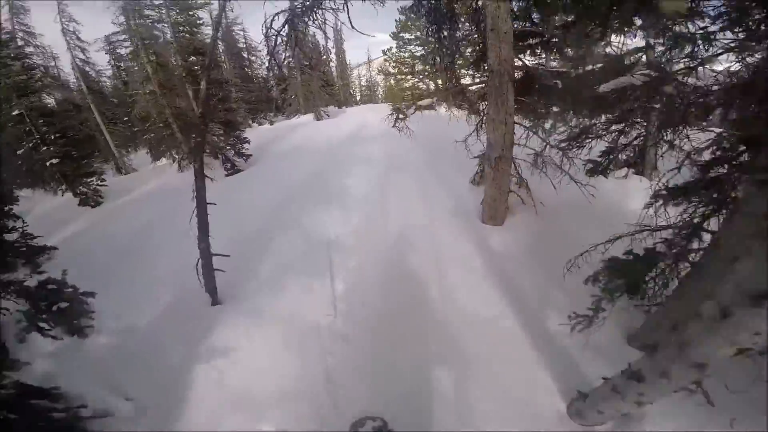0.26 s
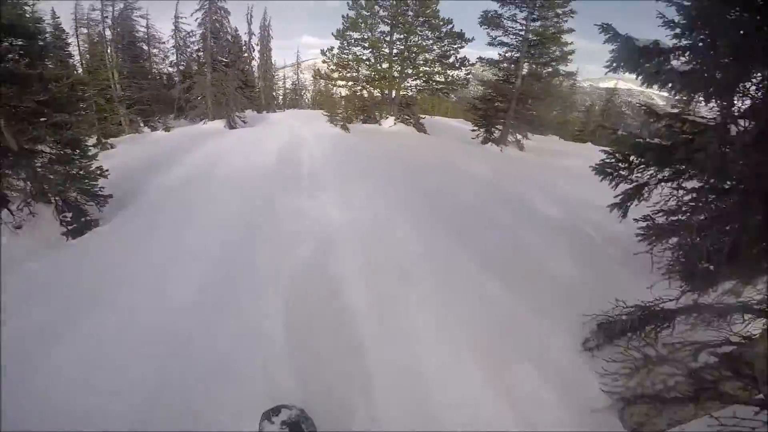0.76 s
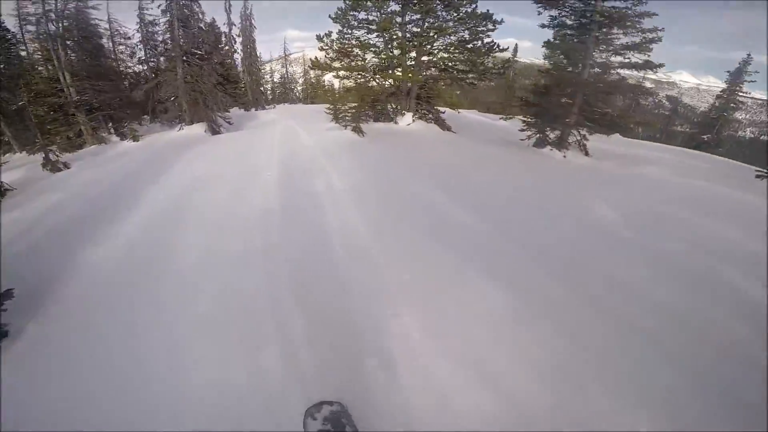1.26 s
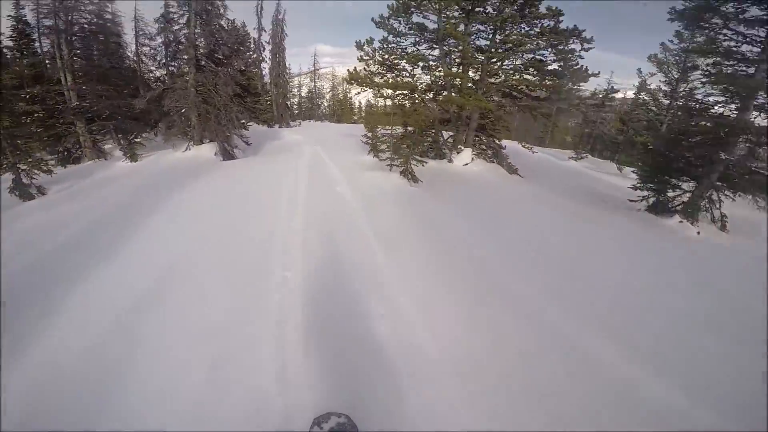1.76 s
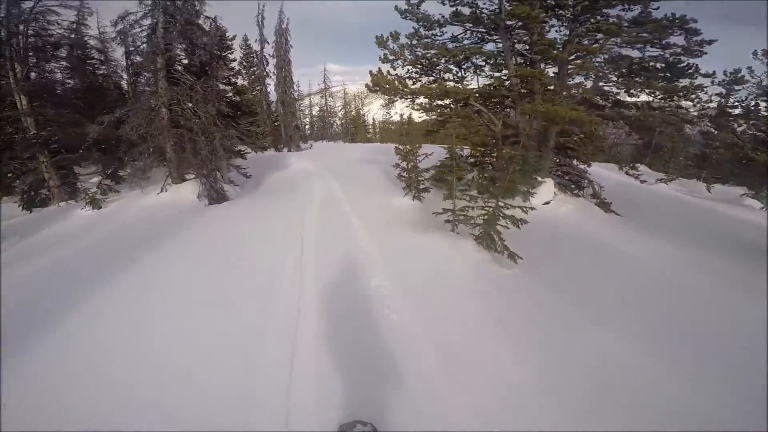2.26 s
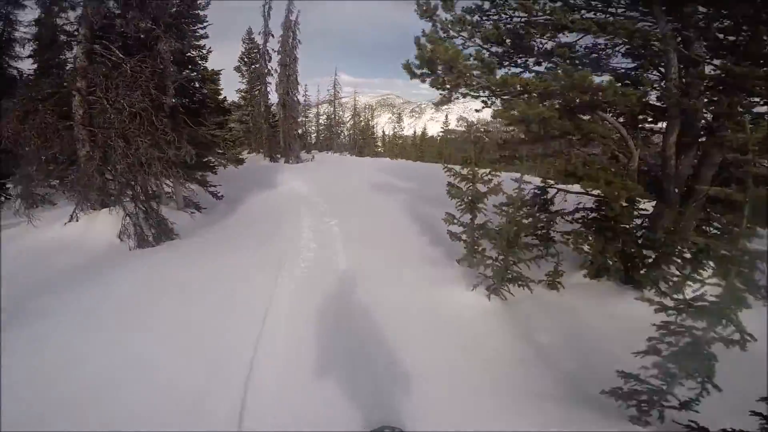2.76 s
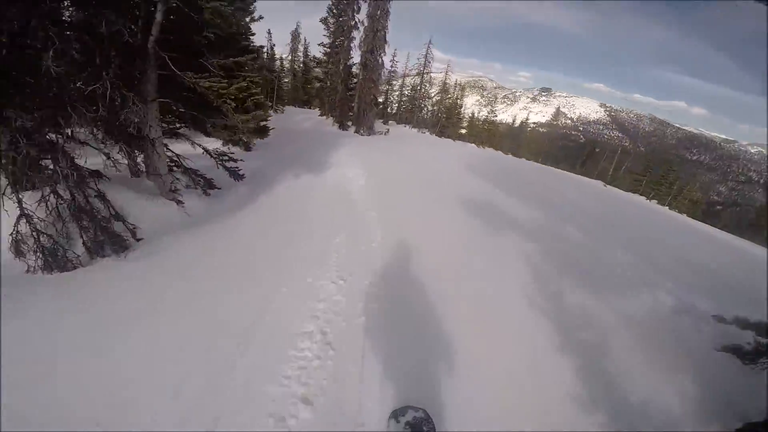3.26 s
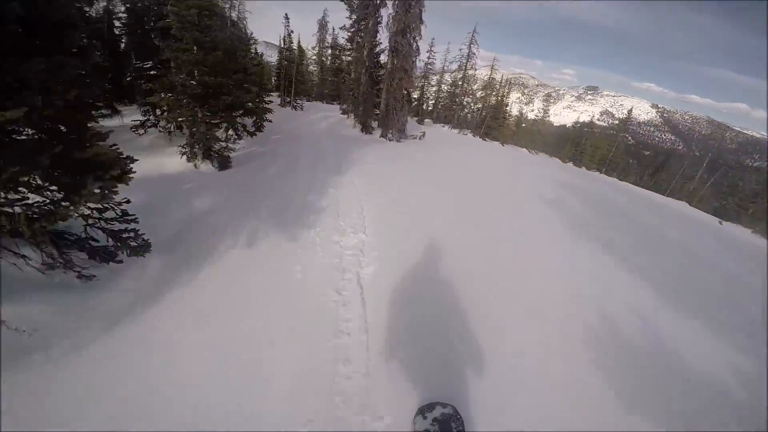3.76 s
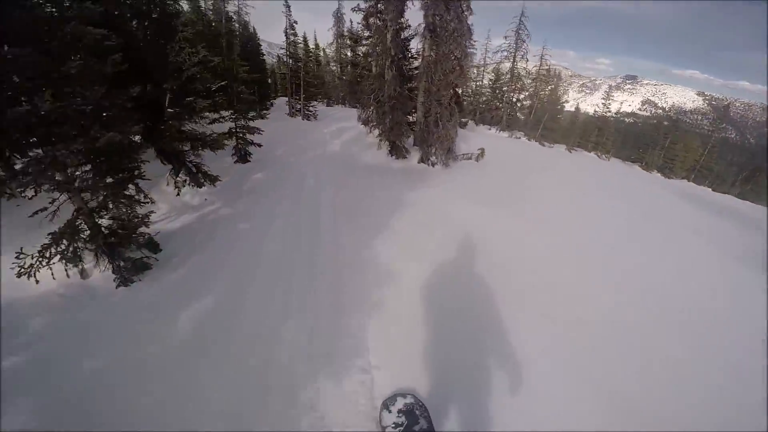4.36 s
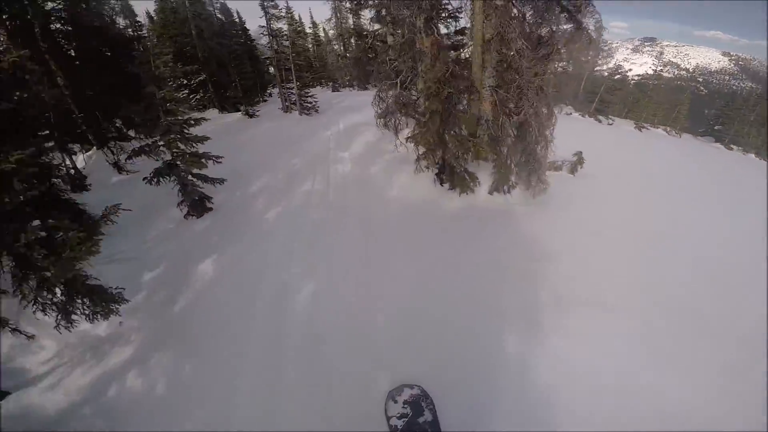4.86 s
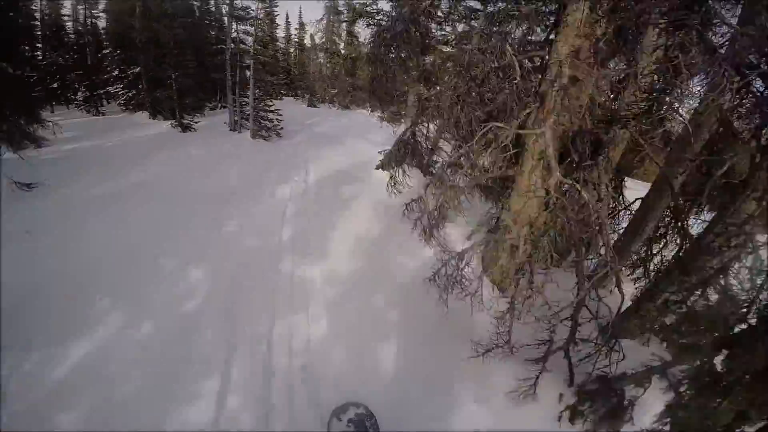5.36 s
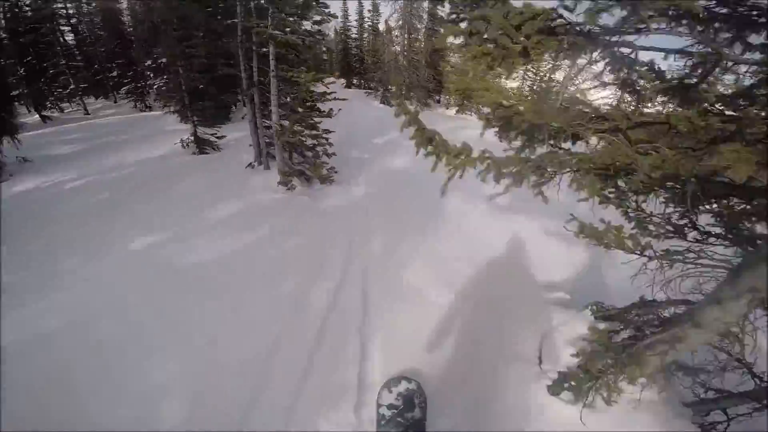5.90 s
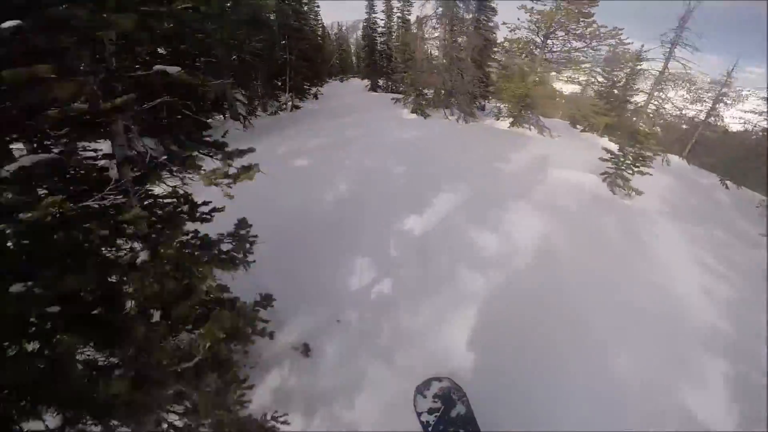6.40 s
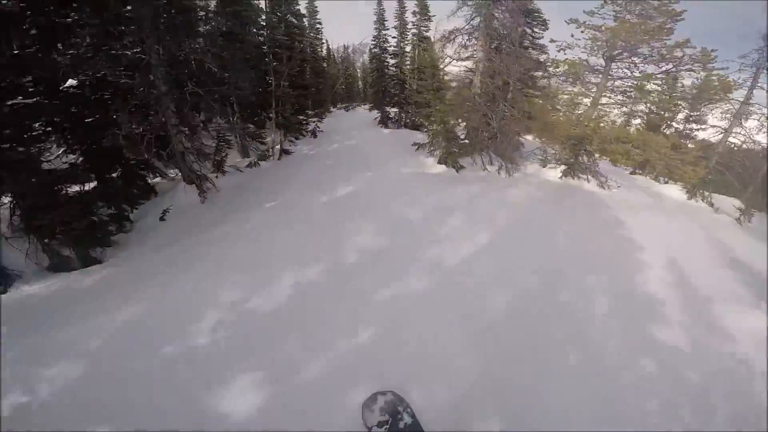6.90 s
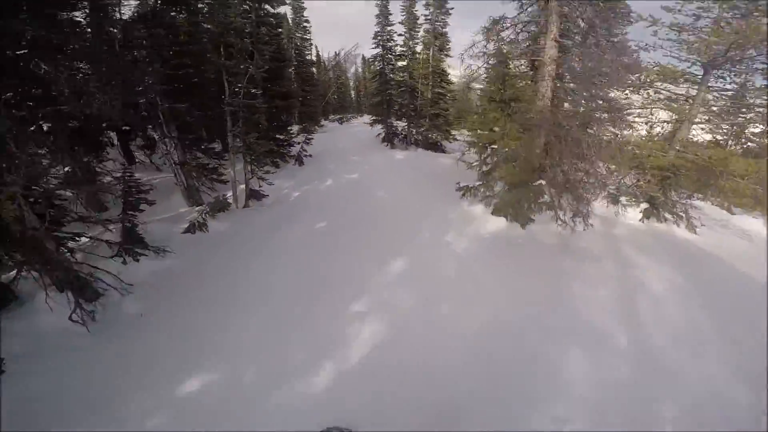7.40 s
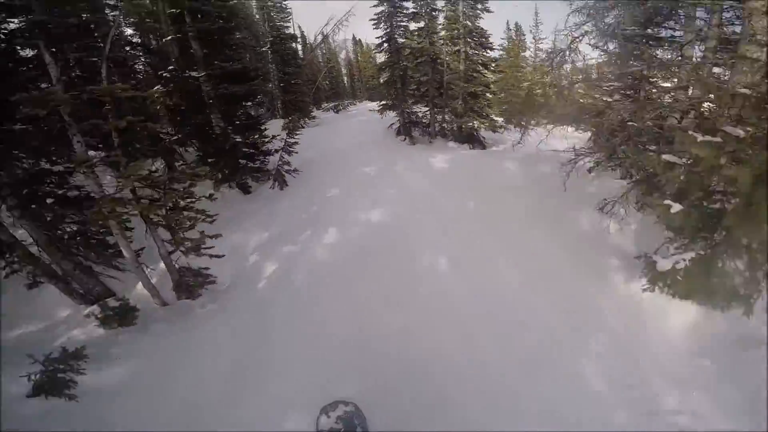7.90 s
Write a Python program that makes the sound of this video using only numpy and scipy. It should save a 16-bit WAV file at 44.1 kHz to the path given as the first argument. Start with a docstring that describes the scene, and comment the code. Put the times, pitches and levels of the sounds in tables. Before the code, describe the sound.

A snowboard hisses through powder, quiet at first and then thickening, under low rumbling wind, with one loud branch slap near the end.

```python
"""A snowboard runs through powder: shearing crystals are random clicks filtered into hiss, spray and dust.
All is heard from a camera in a housing on the rider's helmet; turns and clumps of snow raise the hiss.
Wind is filtered noise that rumbles, shakes the mount, blows through the housing's gaps and whistles once.
The mount clacks over a few bumps and a fir branch slaps the camera once: short contacts ring the housing's
modes, and the mount swings as decaying sines. Crumbs of snow tick as short bursts of band-passed noise."""
import sys
import numpy as np
from scipy import signal
from scipy.fft import rfft, irfft
from scipy.io import wavfile
from scipy.ndimage import uniform_filter1d, minimum_filter1d

SR = 44100
rng = np.random.default_rng(int(sys.argv[2]) if len(sys.argv) > 2 else 0)


def store_wav(level_fs):
    """Save 16-bit WAV to argv[1]."""
    pcm = np.round(np.clip(np.atleast_2d(level_fs), -1, 1) * 32767)
    wavfile.write(sys.argv[1], SR, pcm.T.astype(np.int16))


N = 359104
TIME = np.arange(N) / SR   # s

# Wind pressure of the airspeed. Each row: time in seconds, level relative to cruising in dB.
AIRSPEED = [(0.0, -9), (1.1, -9), (2.0, -12.5), (2.85, -10.5), (3.55, -1.5), (4.1, -2), (6.0, 1.5),
            (6.6, -0.5), (7.1, 1), (8.14, 2.5)]


def from_db(db):
    """Amplitude ratio: 20 dB is a factor of ten."""
    return 10 ** (np.asarray(db) / 20)


def rms_one(x):
    """Power normalisation: scale to unit rms."""
    return x / np.sqrt(np.mean(x ** 2) + 1e-20)


def in_time(rows):
    """Linear interpolation: each level column of a curve at every sample."""
    seconds, *columns = np.transpose(rows)
    return [np.interp(TIME, seconds, column) for column in columns]


def held(start, end, attack_s, release_s):
    """Trapezoidal envelope: rise to 1 by start, hold until end, fall back to 0."""
    rise = 1 + (TIME - start) / attack_s
    fall = 1 - (TIME - end) / release_s
    return np.clip(np.minimum(rise, fall), 0, 1)


def swell(s, half_length):
    """Gaussian envelope: a smooth bump of height 1 around time s."""
    return np.exp(-np.minimum(((TIME - s) / half_length) ** 2, 50))


def coloured(x, spectrum):
    """Linear filtering by Fourier transform: weight x by a spectrum, then scale to rms 1."""
    hz, db = np.transpose(spectrum)
    bins = np.arange(N // 2 + 1) * SR / N + 1e-3
    octaves_beyond = np.abs(np.log2(bins / np.clip(bins, hz[0], hz[-1])))
    # outside the table the level falls by 20 dB per octave
    gain_db = np.interp(np.log(bins), np.log(hz), db) - 20 * octaves_beyond
    return rms_one(irfft(rfft(x) * from_db(gain_db), N))


def drift(rate_hz):
    """Low-passed noise: two equal poles at rate_hz give a smooth random wandering of spread 1."""
    step = 40   # samples between the points of the slow noise
    r = np.exp(-2 * np.pi * rate_hz * step / SR)
    points = rng.standard_normal(N // step + 2002)
    slow = signal.lfilter([1], [1, -2 * r, r * r], points)[2000:]   # without the filter's start
    return np.interp(np.arange(N) / step, np.arange(len(slow)), rms_one(slow))


def steadied(x, window_s):
    """Envelope division: local rms evens out the slow swells of a noise and keeps its quick lumps."""
    power = uniform_filter1d(x ** 2, max(int(window_s * SR), 2))
    return rms_one(x / np.sqrt(np.abs(power) + 1e-9))


def grains(per_s, spread_db):
    """Shot noise: independent random clicks of uneven size."""
    size_db = spread_db * np.minimum(rng.exponential(1, N), 5)
    sizes = from_db(size_db) * rng.standard_normal(N)
    return sizes * (rng.random(N) < per_s / SR)


def resonance(x, hz, width_hz):
    """Damped resonator: a two-pole band-pass with gain 1 on top."""
    r = np.exp(-np.pi * width_hz / SR)
    numerator = np.array([1, 0, -1]) * (1 - r * r) / 2
    return signal.lfilter(numerator, [1, -2 * r * np.cos(2 * np.pi * hz / SR), r * r], x)


def ring(clicks, hz, t60):
    """Impulse response of a damped mode: a unit click starts a decaying sine of height 1."""
    r = np.exp(-np.log(1000) / (t60 * SR))
    w = 2 * np.pi * hz / SR
    return signal.lfilter([0, np.sin(w)], [1, -2 * r * np.cos(w), r * r], clicks + 1e-18)


def add(out, s, sound):
    """Superposition: mix a short sound in at time s."""
    at = int(s * SR)
    out[at:at + len(sound)] += sound[:N - at]


def snow(lumps_db=0.87, patter_db=0.4, unevenness_db=1.35):
    """Granular friction: crystals shear under the base as hiss and fly off the edge as spray and dust."""
    # Rubbing of the board between turns. Each row: time in seconds, gliding hiss in dB.
    board = [(0.0, -71.5), (0.3, -58), (0.6, -58.5), (0.8, -67), (1.4, -68), (1.7, -84), (1.95, -65.5),
             (2.6, -65.5), (3.32, -60.5), (3.42, -53), (3.88, -54.5), (4.05, -49.5), (4.5, -49),
             (5.85, -49.5), (6.42, -46.5), (6.72, -54), (7.05, -45.5), (7.75, -48), (8.14, -44)]
    # The edge digs in and throws snow. Each row: start and end in seconds, rise of hiss and of spray in dB.
    turns = [(0.0, 0, 13, -5), (2.914, 2.955, 3.5, 8), (3.558, 3.582, 6, 2.5), (4.93, 5.696, 1, 7),
             (5.257, 5.423, 3, 3.5), (5.61, 5.68, 4.5, 4), (7.187, 7.55, 5, 5.5), (7.476, 7.537, 3, 4.5),
             (8.041, 8.038, 7, 10)]
    # The board breaks through a firmer clump. Each row: start in seconds, rise in dB, decay in seconds.
    clumps = [(2.303, 9, 0.023), (2.975, 6, 0.017), (3.229, 13.5, 0.028), (3.522, 4, 0.01),
              (3.968, 2, 0.011), (4.995, 1, .035), (5.125, 0, 0.0081), (6.14, 7.5, 0.012), (6.654, 8, .014),
              (7.947, 3, 0.0088)]
    # Fine powder blows over the housing. Each row: centre and half length in seconds, level in dB.
    clouds = [(1.5, 0.077, -67.5), (4.35, .4, -79), (5.42, .11, -65), (5.644, 0.098, -62.5),
              (6.36, 0.22, -70.5), (6.857, 0.15, -67)]
    # Spectra of the hiss and the spray. Each row: frequency in Hz, relative level in dB per Hz.
    glide_spectrum = [(300, -21.5), (620, -22.5), (950, -13), (1220, -4), (1340, -3.5), (1460, 2),
                      (1590, -4.5), (1740, -8.5), (2020, -8), (2300, -13.5), (3500, -21.5), (6000, -61),
                      (12000, -63)]
    spray_spectrum = [(1400, -41), (2000, -7.5), (2500, 2.5), (3100, 1.5), (3500, 5), (3900, 0.5),
                      (4250, 1), (4750, -5), (5200, -5.5), (5650, -10.5), (6100, -8.5), (7000, -16.5),
                      (9500, -37), (15000, -49)]

    glide_db, = in_time(board)
    speed_db, = in_time(AIRSPEED)
    # spray is -61 dB at a hiss of -50 dB and cruising speed; slopes in dB per dB
    spray_db = -61 + 0.85 * (glide_db + 50) + 0.55 * speed_db
    for start, end, hiss_rise_db, spray_rise_db in turns:
        edge = held(start, end, attack_s=0.098, release_s=0.11)
        glide_db = glide_db + hiss_rise_db * edge
        spray_db = spray_db + spray_rise_db * edge

    lumps = lumps_db * drift(21) + unevenness_db * drift(6.2)   # dB
    for s, rise_db, decay in clumps:
        add(lumps, s, rise_db * np.exp(-TIME[:SR // 5] / decay))

    glide_gain = from_db(glide_db + lumps + patter_db * drift(33))
    glide = coloured(grains(16000, spread_db=1.5), glide_spectrum) * glide_gain
    spray = coloured(grains(20000, spread_db=4.0), spray_spectrum) * from_db(spray_db + lumps)

    powder = from_db(spray_db - 24)   # a little of the spray always reaches the housing
    for s, half_length, db in clouds:
        powder = powder + from_db(db) * swell(s, half_length)
    dust = rms_one(resonance(grains(6000, spread_db=2.5), 5300, 4800)) * powder
    return glide + spray + dust


def wind(flicker_db=1.5, eddy_gust_share=0.059):
    """Turbulent pressure: big eddies press on the housing and shake the mount, small ones add a low rush."""
    # Gusts and lulls. Each row: centre and half length in seconds, change of buffeting and of shaking in dB.
    gusts = [(0.045, 0.21, -12, -4.5), (0.446, 0.046, 4, 4), (.68, 0.023, 15, 0), (0.943, .13, 4, 8.5),
             (1.888, .07, 8, 6), (2.423, 0.26, 5.5, 5), (3.38, 0.061, -5, 5), (3.525, 0.047, 6, -10),
             (3.803, 0.26, -6.5, 2.5), (4.926, 0.1, 12.5, 8), (5.5, 0.34, 7.5, 5), (6.19, 0.18, 6.5, 0.5),
             (6.795, 0.24, 5.5, 6.5), (7.164, .1, -7, 1), (7.955, 0.16, 9.5, 0), (8.14, 0.085, -14, 5)]
    # Spectra of the three wind noises. Each row: frequency in Hz, relative level in dB per Hz.
    buffet_spectrum = [(6, -20), (14, -2), (22, 1), (34, -5.5), (50, -21), (80, -34), (200, -59)]
    shake_spectrum = [(35, -22), (58, -3.5), (70, -6), (82, 0), (91, -8.5), (102, -15.5), (130, -32),
                      (220, -41)]
    eddy_spectrum = [(80, 6), (135, 4), (168, -1.5), (192, 4.5), (212, -4), (275, -3), (340, -9),
                     (480, -10.5), (650, -14), (1200, -14.5), (4000, -54)]

    speed_db, = in_time(AIRSPEED)
    push_db = sum(db * swell(s, half_length) for s, half_length, db, _ in gusts)
    rock_db = sum(db * swell(s, half_length) for s, half_length, _, db in gusts)
    # each level: dB at cruising speed, then dB per dB of wind pressure
    buffet_db = -37 + 0.22 * speed_db + push_db
    shake_db = -42 + 0.69 * speed_db + rock_db
    eddy_db = -51 + speed_db + eddy_gust_share * rock_db + flicker_db * drift(22)

    buffet = steadied(coloured(rng.standard_normal(N), buffet_spectrum), window_s=0.124)
    shake = steadied(coloured(rng.standard_normal(N), shake_spectrum), window_s=0.3)
    eddies = coloured(rng.standard_normal(N), eddy_spectrum)
    return buffet * from_db(buffet_db) + shake * from_db(shake_db) + eddies * from_db(eddy_db)


def draught(flutter_db=1.5):
    """Cavity resonance: fluttering air streams through the gaps and excites the housing's air cavities."""
    # Air through the gaps. Each row: time in seconds, hiss level in dB.
    stream = [(0, -75), (.95, -63.5), (1.2, -59.5), (1.55, -58.5), (1.66, -66), (1.85, -60.5),
              (2.45, -63.5), (3.3, -71), (4.2, -66), (8.14, -55.5)]
    # Air cavities of the housing. Each row: frequency and width in Hz, relative level in dB.
    cavities = [(459, 87, 3.5), (1410, 390, -8), (1930, 270, 2.5), (2700, 340, 1), (3520, 410, -2.5),
                (4290, 340, 2), (4960, 160, -2.5), (5270, 130, -1.5), (6190, 140, -5.5), (7300, 380, -13.5),
                (8550, 400, -12.5), (9700, 1250, -17)]

    air = rng.standard_normal(N) * from_db(flutter_db * drift(33))
    hiss = np.zeros(N)
    for k, (hz, width_hz, db) in enumerate(cavities):
        hiss += (-1) ** k * from_db(db) * resonance(air, hz, width_hz)   # neighbours in opposite phase
    level_db, = in_time(stream)
    return rms_one(hiss) * from_db(level_db)


def crumbs():
    """Band-limited burst: a crumb of snow ticks on the housing as a short, decaying fizz."""
    # Each row: start in seconds, level in dB, centre and width of the band in Hz, decay in seconds.
    crumb_list = [(0.67, -64, 10400, 7000, 0.014), (1.584, -59, 8000, 3500, .005),
                  (4.879, -59, 7200, 3000, .005), (5.432, -61, 12500, 5000, .016),
                  (5.834, -60, 10800, 5500, .016), (7.203, -57, 7600, 3000, .005),
                  (7.825, -60, 7040, 3000, .005)]
    out, t = np.zeros(N), TIME[:SR // 10]
    for s, db, hz, width_hz, decay in crumb_list:
        fizz = resonance(rng.standard_normal(len(t)), hz, width_hz)
        fizz = resonance(fizz, hz, width_hz)
        add(out, s, from_db(db) * rms_one(fizz) * np.exp(-t / decay))
    return out


def knocks(modes_db=-14.5, crack_db=-9.5):
    """Impact excitation: a brief rattling contact cracks and sets the housing's modes ringing."""
    # Each row: start in seconds, relative level in dB, contact length in seconds,
    # low-pass corner in Hz (low for dull knocks), high-pass corner in Hz (high for thin ones).
    knock_list = [(0.7947, -28.5, 0.0011, 1500, 130), (1.2432, -33, 0.0013, 4400, 300),
                  (1.483, -32.5, 0.0028, 1700, 100), (1.584, -41.5, 0.0031, 2800, 900),
                  (1.799, -43.5, 0.0071, 2400, 1000), (6.2128, -15.5, 0.0054, 6000, 3000),
                  (6.224, -7, 0.004, 4970, 600), (6.2276, -6, .004, 8200, 100),
                  (6.2307, -16, 0.0035, 12000, 150), (6.237, -15.5, 0.0052, 4860, 1190)]
    # Modes of the housing. Each row: frequency in Hz, relative level in dB, 60 dB decay time in seconds.
    modes = [(158, 2, 0.039), (280, 2, 0.03), (410, -5, 0.025), (470, -3.5, 0.061), (840, -8, 0.019),
             (1348, 1, 0.03), (1557, 4.5, 0.0099), (1840, -0.5, 0.01), (2165, -6, 0.043), (2720, 8, 0.0097),
             (2720, 2.5, 0.0073), (4000, -25, 0.014), (4170, 7.5, 0.012), (4574, 9.5, 0.0062),
             (6460, -16, 0.0055), (8060, -5, 0.0055), (9100, -10, 0.0052)]
    # Dry crack of a contact. Each row: frequency in Hz, relative level in dB per Hz.
    crack_spectrum = [(150, -2.5), (780, -6.5), (1500, -5), (2900, -1.5), (3500, -7), (4600, -9),
                      (5600, -19), (9000, -14), (10200, -27), (15000, -22)]

    out, t = np.zeros(N), TIME[:SR // 10]
    crackle = coloured(rng.standard_normal(N), crack_spectrum)
    for s, db, length, dull_hz, thin_hz in knock_list:
        pressure = np.exp(-(t / length) ** 2)
        crack = steadied(crackle[int(s * SR):][:len(t)], window_s=0.00079)
        sound = from_db(crack_db) * crack * pressure
        for hz, mode_db, t60 in modes:
            mode = ring(pressure * rng.standard_normal(len(t)), hz, t60)
            mode = resonance(mode, hz, hz / 2)   # the walls pass little away from the mode
            sound = sound + mode / np.abs(mode).max() * from_db(mode_db + modes_db)
        sound = signal.sosfilt(signal.butter(2, dull_hz, fs=SR, output="sos"), sound)
        sound = signal.sosfilt(signal.butter(1, thin_hz, "high", fs=SR, output="sos"), sound)
        add(out, s, from_db(db) * sound)
    return out


def jolts():
    """Damped oscillation: after a jolt the camera swings up on its springy mount and dies away."""
    # Each row: crest in seconds, frequency in Hz, level in dB, rise and 60 dB decay time in seconds.
    jolt_list = [(1.495, 81.4, -17.5, 0.027, 0.27), (1.494, 146, -41.5, 0.016, 0.12),
                 (1.518, 40.2, -19, 0.062, 0.29), (2.478, 23.4, -19.5, 0.088, 1.2),
                 (6.2316, 83.7, -4, 0.0086, .17), (6.247, 30, -7.5, 0.0047, 0.086),
                 (6.232, 123, -12.5, 0.0044, 0.041), (6.249, 188, -27, 0.014, 0.14)]
    out = np.zeros(N)
    for s, hz, db, rise, t60 in jolt_list:
        t = TIME - s
        growth = -(np.minimum(t, 0) / rise) ** 2
        decay = -np.log(1000) * np.maximum(t, 0) / t60
        out += from_db(db) * np.exp(growth + decay) * np.cos(2 * np.pi * hz * t)
    return out


def whistle(width_hz=120):
    """Narrow-band noise: one gap sings, an unsteady, airy tone that starts sharp, settles and fades."""
    start_s, end_s, level_db = 1.97, 2.07, -55
    attack_s, t60_s = 0.059, 1
    settled_hz, sharp_hz, settle_s = 2090, 90, 0.041

    pitch = settled_hz + sharp_hz * np.exp(-np.maximum(TIME - start_s, 0) / settle_s)
    phase = 2 * np.pi * np.cumsum(pitch) / SR
    tone = rms_one(drift(width_hz) * np.cos(phase) + drift(width_hz) * np.sin(phase))
    attack = np.clip(1 + (TIME - start_s) / attack_s, 0, 1)   # complete at start_s
    fade = np.exp(-np.log(1000) * np.maximum(TIME - end_s, 0) / t60_s)
    return from_db(level_db) * tone * attack * fade


def self_noise(level_db=-68.0):
    """Stationary noise: a steady, coloured noise floor."""
    # Each row: frequency in Hz, relative level in dB per Hz.
    floor_spectrum = [(100, 5), (1000, 7), (4000, 2), (7500, -0.5), (11000, -4), (15500, -7)]
    return from_db(level_db) * coloured(rng.standard_normal(N), floor_spectrum)


def scene():
    """Superposition: everything adds up at one microphone in the open air, without echoes."""
    air_and_snow = snow() + wind() + draught() + whistle()
    contacts = crumbs() + knocks() + jolts()
    return (air_and_snow + contacts + self_noise())[None]


def limited(x, ceiling=0.79, hold_s=0.0018):
    """Gain reduction: a quick limiter ducks just around any peak above the ceiling."""
    size = max(int(hold_s * SR), 2)
    gain = np.minimum(1, ceiling / (np.abs(x) + 1e-9))
    return x * uniform_filter1d(minimum_filter1d(gain, size), size)


def record(dry):
    """Limiting and band limitation: the limiter catches the slap, then a steep low-pass cuts the top."""
    cutoff_hz = 15400
    low_pass = signal.ellip(10, .1, 80, cutoff_hz, fs=SR, output="sos")
    return signal.sosfilt(low_pass, limited(dry))


dry = scene()
out = record(dry)
store_wav(out)
```